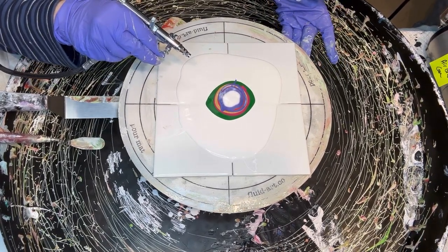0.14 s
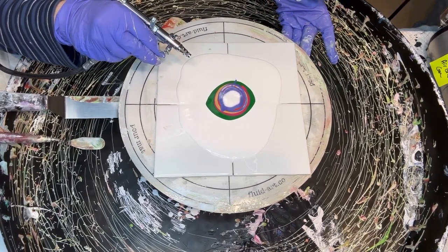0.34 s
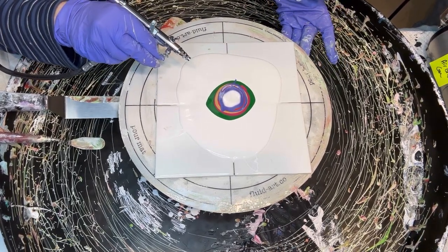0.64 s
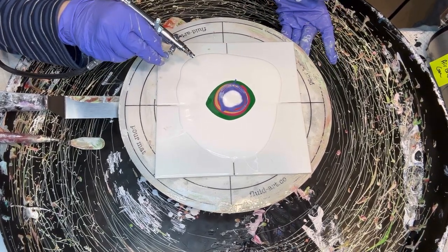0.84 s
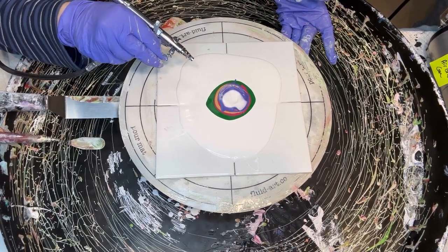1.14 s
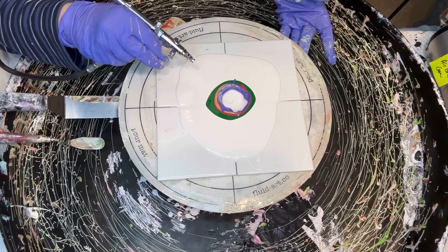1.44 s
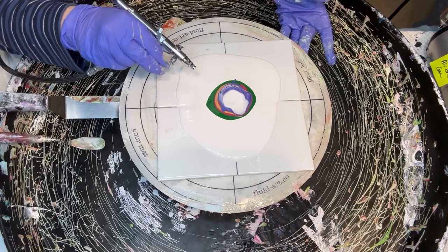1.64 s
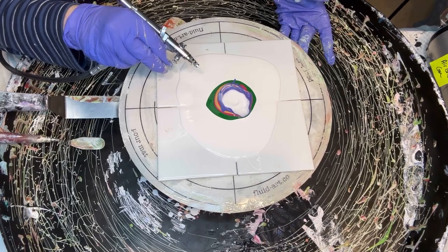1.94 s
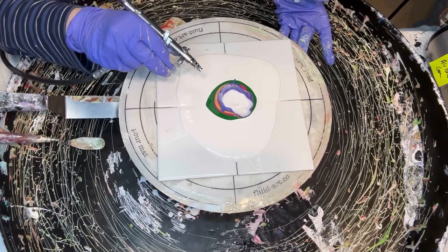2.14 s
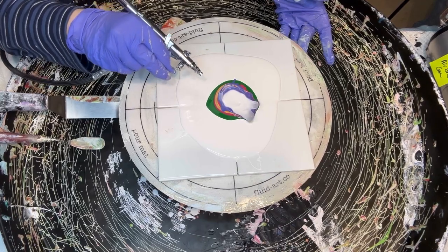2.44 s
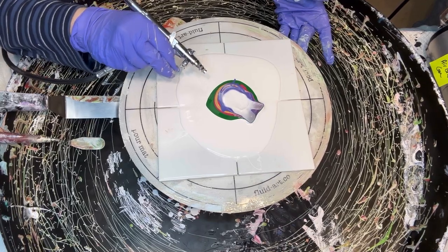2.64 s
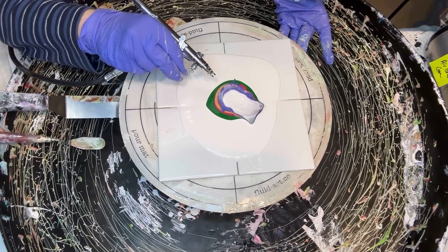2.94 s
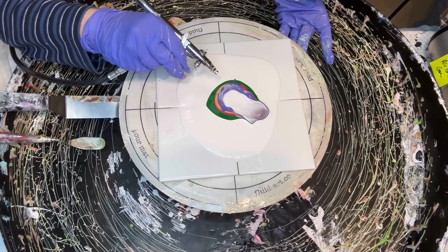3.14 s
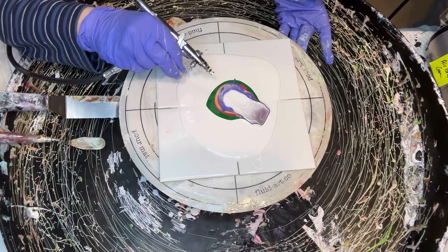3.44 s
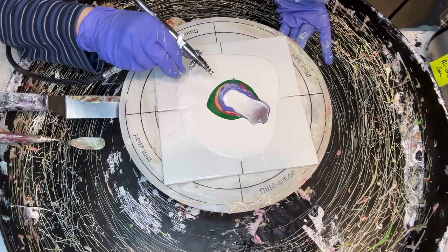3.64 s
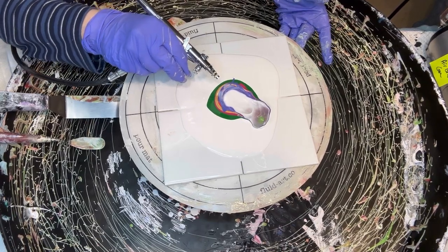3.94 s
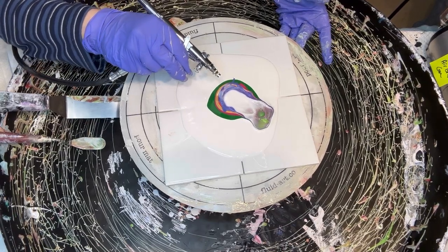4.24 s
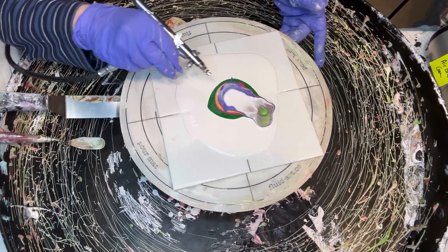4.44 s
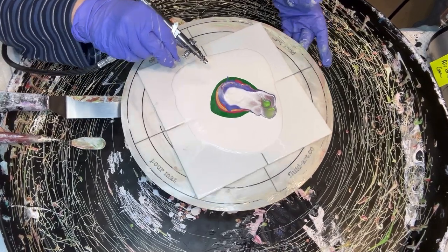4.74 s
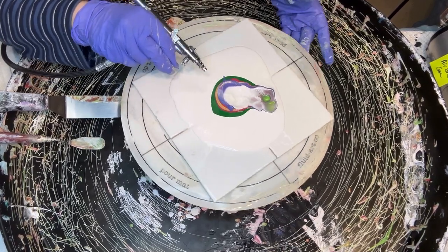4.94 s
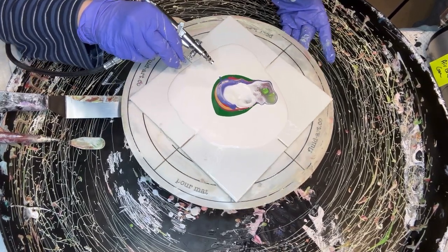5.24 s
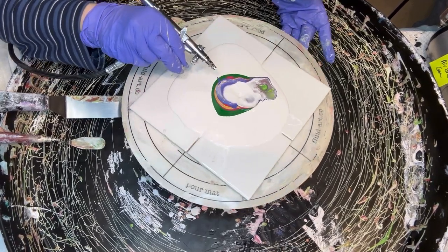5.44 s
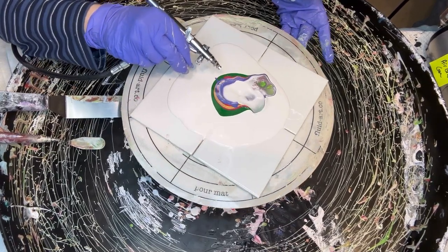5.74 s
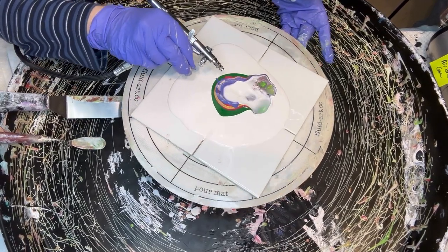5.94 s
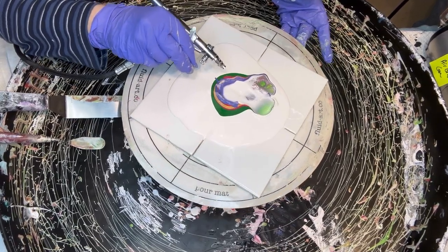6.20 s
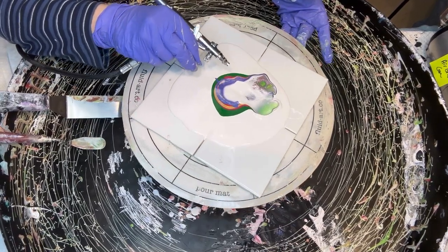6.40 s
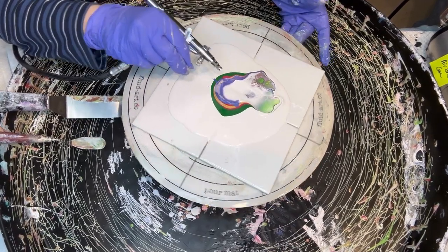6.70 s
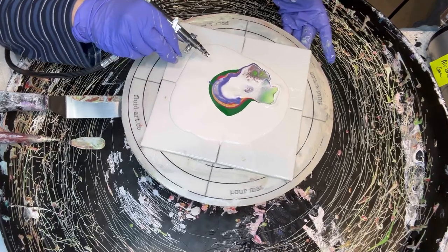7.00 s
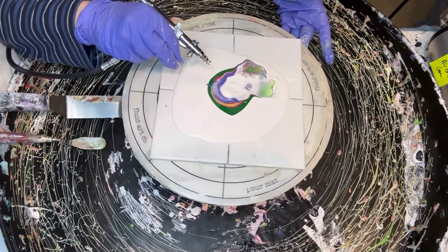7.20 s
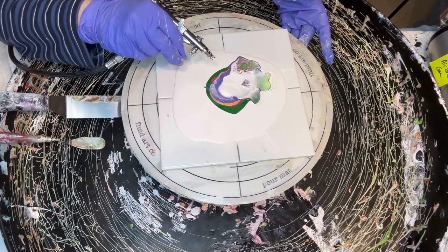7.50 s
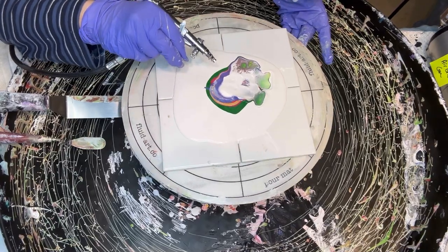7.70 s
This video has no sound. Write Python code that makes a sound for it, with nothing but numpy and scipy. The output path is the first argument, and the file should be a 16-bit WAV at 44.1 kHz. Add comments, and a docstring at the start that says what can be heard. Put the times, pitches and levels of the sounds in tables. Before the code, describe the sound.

A close, dry stereo sound at an indoor work table, lasting nearly eight seconds. From 0 s a thin, bright airbrush hiss is already blowing, over a very faint distant fan and dull room air. At about 0.03 s a small piston compressor under the table switches on: a few uneven, muffled knocks quicken, and by about 0.15 to 0.2 s it is at full speed. It then runs without stopping, roughly twenty-eight blows a second, a hard hollow metallic chatter with small reed ticks, loose rattle, low air thumps and a steady low electric hum. Over the first two seconds or so the pace eases very slightly and the knock colour shifts as the tank fills. The hiss wavers gently as the nozzle moves, a little stronger and thinner around 6.5 s, then eases back. Compressor and hiss continue to the end at about 7.9 s.

```python
"""A work table indoors: a small piston compressor comes up beneath it and settles to its speed, while an
airbrush hisses close by and a fan hums far off in the building. At each crank turn a valve knock rings the
housing, its reed answers and an air thump shakes the frame, all as decaying sines; the motor hums at twice
the mains rate, and its torque ripple shifts the knocks and weights every blow. Rattle and hiss are
coloured noise. A pair of close microphone ports listens."""
import sys
import numpy as np
from scipy import signal
from scipy.fft import rfft, irfft
from scipy.io import wavfile

SR = 44100
rng = np.random.default_rng(int(sys.argv[2]) if len(sys.argv) > 2 else 0)


def output_pcm(signal):
    """Save a mono or channel-first signal as 16-bit PCM at the path in sys.argv[1].

    Samples are clipped to [-1, 1] before scaling.
    """
    pcm = np.clip(np.atleast_2d(signal).T, -1, 1) * 32767
    wavfile.write(sys.argv[1], SR, np.round(pcm).astype(np.int16))


N = 346626
TIME = np.arange(N) / SR

# Airbrush jet; the tile echo changes as the paint spreads and the nozzle tilts:
# (time [s], level [dB], echo lag [ms], echo share [0-1], change below JET_BODY_HZ [dB])
JET_COURSE = [(0, -35.5, 0.19, 0.087, -3.5), (.1, -36, 0.24, .065, -0.5), (.3, -35.5, 0.26, 0.042, 1),
              (1.5, -34.5, 0.27, 0.076, 1.1), (2.6, -34.5, 0.21, .02, 1), (3.6, -34, 0.1, 0.028, 0.3),
              (4.3, -34.5, 0.21, 0.045, 0.1), (4.8, -34.5, 0.28, 0.025, 2), (5.4, -35, 0.228, 0.042, 1.8),
              (6.5, -32.5, .225, 0.064, -2.2), (7.2, -34, 0.216, 0.053, 1.5), (7.86, -35, 0.22, 0.08, 1)]
# Hiss changes as the nozzle moves: (time [s], change near JET_FOCUS_HZ [dB], change above JET_TOP_HZ [dB])
JET_SHIFT = [(0, -1, -1), (.6, 0.5, 1), (1.8, 1, 0.6), (2.6, 0, 0), (3.6, -3, 0.1), (4.6, 1, 0.5),
             (5.3, -2, 1), (6.3, 1, -0.5), (7.2, -.8, -0.1), (7.86, 1, 1.5)]
# Hiss colour: (frequency [Hz], relative density [dB per Hz])
JET_COLOUR = [(1000, -22), (2200, -9), (3000, -11.3), (4200, -10), (5500, -8.2), (6700, -4.2), (7800, -3.2),
              (9600, -3), (10600, -.8), (12300, -2), (14000, -.7), (15000, 2)]
# Share of hiss power common to both ports, heard directly: (frequency [Hz], share [0-1])
JET_DIRECT = [(2000, .3), (3000, .35), (4600, .3), (5700, .2), (7000, .72), (8000, .68), (9400, .78),
              (10000, .99), (11500, .99), (12200, .83), (14900, .82), (15200, 1)]
# Phase of the direct hiss at the right against the left; around 10-11.5 kHz the two sides sound in step:
# (frequency [Hz], phase [rad])
JET_PORTS = [(2600, 0), (3300, .4), (3800, 2.6), (7000, 3.1), (8200, 2.1), (9000, 1.1), (9900, 0),
             (11500, 0), (12000, -.75), (14900, -2.55), (15200, -3.14)]
# Rattle colour: (frequency [Hz], relative density [dB per Hz])
RATTLE_COLOUR = [(40, -19), (120, -40), (190, -1), (270, -4.5), (400, -4), (600, -5), (780, -15),
                 (920, -17), (1080, -8), (1250, -10), (1530, -8.5), (1680, -4.5), (1780, -14), (2600, -21),
                 (7000, -29)]
# Rattle likeness between left and right: (frequency [Hz], likeness [-1 to 1])
RATTLE_LIKENESS = [(60, 0.33), (300, -0.72), (900, 0.66), (2000, -0.059), (4000, 0.6)]
# Housing modes rung by the valve; the sign is the direction of the first swing:
# (frequency [Hz], t60 [s], full-tank height left, right [linear], empty-tank height left, right [linear])
HOUSING_MODES = [(247.6, 0.35, -0.0013, -0.0014, 0.00013, -0.0004),
                 (283.5, 0.33, -0.0017, -0.0011, -0.0027, -0.0026),
                 (298.9, 0.35, 0.0027, 0.0026, 0.0041, 0.0031),
                 (328.9, 0.35, -0.0019, -0.002, 0.0018, 0.0011),
                 (359.8, 0.35, 0.0017, 0.0012, 0.0047, 0.0031),
                 (387.9, 0.301, -0.0021, -0.0065, -0.0046, -0.0052),
                 (416.5, 0.06, 0.0069, 0.014, 0.0019, -0.0021),
                 (436.1, 0.35, -0.0073, -0.0099, 0.002, 0.0048),
                 (473.4, 0.35, 0.00031, -0.0022, 0.00099, -0.00035),
                 (495.8, 0.35, -8.4e-05, 0.0023, -7.5e-05, 0.002),
                 (534.8, 0.35, 0.0012, 0.0085, 0.0019, 0.0045),
                 (572.6, 0.35, -0.0033, -0.0075, -0.0052, -0.008),
                 (610.5, 0.198, -0.007, -0.01, -0.00022, 0.0035),
                 (642.5, 0.069, -0.008, -0.014, -0.015, -0.02),
                 (687.3, 0.22, -0.0038, -0.0091, -0.0051, -0.011),
                 (714.7, 0.013, 0.045, 0.087, 0.04, 0.053), (761.8, 0.071, -0.011, -0.01, -0.0099, -0.0098),
                 (797.9, 0.12, -0.016, -0.014, -0.013, -0.032),
                 (832.2, 0.137, -0.018, 0.0087, -0.021, 0.004), (843.8, 0.021, 0.094, 0.036, 0.11, 0.098),
                 (891.9, 0.092, -0.034, 0.091, -0.079, 0.11),
                 (906.1, 0.165, -0.04, 0.0019, -0.0069, -0.051),
                 (933.0, 0.057, -0.028, -0.2, -0.0012, -0.2), (952.4, 0.132, 0.0098, -0.0063, 0.014, 0.022),
                 (971.8, 0.259, 0.0031, -0.02, 0.0011, 0.0043),
                 (995.6, 0.163, 0.016, 0.019, 0.0039, 0.0098), (1051.1, 0.12, 0.0035, 0.01, -0.0019, 0.003),
                 (1098.5, 0.059, -0.00012, 0.0085, -0.0039, -0.01),
                 (1146.3, 0.051, 0.0052, -0.0058, 0.012, -0.022),
                 (1220.3, 0.054, 0.013, 0.015, 0.016, 0.0096),
                 (1228.8, 0.014, -0.054, -0.091, -0.061, -0.034),
                 (1266.9, 0.048, 0.018, 0.024, 0.012, 0.0036),
                 (1338.5, 0.121, 0.003, 0.0062, 0.0014, 0.0077),
                 (1363.5, 0.041, 0.0078, -0.0015, 0.017, -0.015),
                 (1415.4, 0.13, 0.0028, 0.00097, 0.00097, 0.0018),
                 (1474.5, 0.097, -0.0029, -0.0047, -0.0034, -0.004),
                 (1514.6, 0.152, -0.0045, 0.0015, -0.008, 0.0032),
                 (1565.5, 0.035, 0.00013, -0.0077, -0.0005, -0.027),
                 (1601.8, 0.122, -0.0058, -0.0035, -0.012, -0.00026),
                 (1637.4, 0.082, 0.0057, -0.0041, 0.0084, 0.0029),
                 (1653.9, 0.082, 0.0035, -0.0069, 0.0041, -0.0086),
                 (1691.6, 0.082, -0.0085, 0.011, -0.0087, 0.011),
                 (1777.5, 0.005, 0.045, 0.046, 0.068, 0.074)]
# Valve reed modes, heard just after each knock and again as the reed bounces:
# (frequency [Hz], t60 [s], full-tank height left, right [linear], empty-tank height left, right [linear])
REED_MODES = [(2070, .04, 0.00058, 0.0012, -0.00005, -0.0033),
              (2120, 0.15, 0.0000064, -0.001, -0.00027, 0.0085),
              (2250, 0.013, -0.0054, 0.00029, 0.0036, 0.0055),
              (3165, 0.11, -0.0012, 0.0018, 0.0019, -0.00034)]
# Frame modes shaken by the thump:
# (frequency [Hz], t60 [s], full-tank height left, right [linear], empty-tank height left, right [linear])
FRAME_MODES = [(65.6, .4, .018, .017, .021, .021), (88.5, .045, -.13, -.11, -.068, -.061),
               (110.2, .1, .1, .098, .063, .062), (155.3, .021, -.029, -.046, -.029, -.043),
               (198.3, .132, .0087, .012, .0075, .01)]
# How torque ripple moves and weights a knock or reed blow, left row then right:
# (shift [ms], shift phase [rad], weight [dB], weight phase [rad])
KNOCK_RIPPLE = [(.09, 1.35, .55, 3.2), (.098, 1.56, .6, 2.95)]
# The same for a thump: (shift [ms], shift phase [rad], weight [dB], weight phase [rad])
THUMP_RIPPLE = [(0, 0, 1.3, 3.5)] * 2
# How each part comes up after switch-on, one row each:
# (floor at rest [dB], spin-up [s], steepness [power], full-tank level [dB], empty-tank change [dB])
RATTLE_RISE = (-16, 0.06, 1, 2.6, -1)
HUM_RISE = (-35, .14, 1.1, -3.7, 1.2)
KNOCK_RISE = (-40, .089, 3.2, -.4, .8)
THUMP_RISE = (-35, .08, 1.6, 0, 0)
# Uneven first blows: (time [s], mode height before random strength and dulling [dB])
RUN_UP_BLOWS = [(0.039, -50), (.049, -53), (.056, -45), (0.063, -46.5), (.080, -46), (0.095, -43),
                (.104, -41)]

# Airbrush: hiss bands, wavering flow, and the echo off the table
JET_BODY_HZ, JET_FOCUS_HZ, JET_FOCUS_WIDE_HZ, JET_TOP_HZ = 10400, 11200, 700, 12200
FLUTTER_DB, FLUTTER_PER_S = .28, 9
TABLE_ECHO_MS, TABLE_ECHO_SHARE = .605, .07

# Distant fan, its rumble, and the air of the room
FAN_HZ, FAN_DB, FAN_RAD = 58.88, -59.5, .63
RUMBLE_DB, RUMBLE_HZ = -61, (48, 77)
ROOM_DB, ROOM_HZ = -55, (60, 724)

# Crank: the angle starts behind a steady rotation and catches up as tank pressure builds
START_TURN, TURNS_PER_S, SURPLUS_TURNS, SETTLE_S = .6184, 27.6495, .487, 1.801
SWITCH_ON_S, RIPPLE_HZ = .033, 120.045
FILL_S = 1.6  # the blows change colour as the tank fills

# Levels before each rise; REPEATING is the share of rattle power that comes back alike on every turn
RATTLE_DB, RATTLE_LEFT_DB, REPEATING = -50, .1, .1
HUM_DB = -37

# Blow positions in the turn (pairs are left, right); the blows lead a little against an empty tank
KNOCK_TURNS, THUMP_TURNS, EMPTY_LEAD_TURNS = (.6127, .6061), (.8133, .8019), .008
REED_TURNS, BOUNCE_TURNS, BOUNCE_DB = .665, .75, -12.5
VALVE_SOFT_HZ = 1900  # the valve plate lands softly: its click is rolled off above this
RUN_UP_T60_S, RUN_UP_DULL_HZ = .04, 950  # slow blows are short and dull

CUTOFF_HZ = 15730


def from_db(db):
    """Decibels to amplitude gain."""
    return 10 ** (np.asarray(db) / 20)


def rms_one(x):
    """Scale to rms 1."""
    return x / np.sqrt(np.mean(x ** 2) + 1e-20)


def in_time(rows):
    """Each column of a time table at every sample."""
    s, *columns = np.transpose(rows)
    return [np.interp(TIME, s, column) for column in columns]


def at_hz(points, hz):
    """Read a (frequency, value) table on a log frequency axis."""
    table_hz, values = np.transpose(points)
    return np.interp(np.log(hz + 1), np.log(table_hz), values)


def band(x, edges_hz):
    """Keep one band of a signal."""
    return signal.sosfilt(signal.butter(2, edges_hz, "band", fs=SR, output="sos"), x)


def crank():
    """Crank angle in turns: slightly fast at first, easing to its final speed."""
    return START_TURN + TURNS_PER_S * TIME - SURPLUS_TURNS * np.exp(-TIME / SETTLE_S)


def rise(rest_db, spin_s, steepness, full_db, empty_db):
    """Level in dB: a floor at rest, then spinning up, then following the tank pressure."""
    up = np.clip((TIME - SWITCH_ON_S) / spin_s, 0, 1) ** steepness
    running = up * from_db(full_db + empty_db * np.exp(-TIME / SETTLE_S))
    return 20 * np.log10(np.maximum(running, from_db(rest_db)))


def ring(clicks, hz, t60):
    """A two-pole resonator: a unit click starts a decaying sine of height 1."""
    r = from_db(-60 / (t60 * SR))
    w = 2 * np.pi * hz / SR
    return signal.lfilter([0, np.sin(w)], [1, -2 * r * np.cos(w), r * r], clicks)


def strokes(modes, at_turns, ripple, level_db, scatter_db, jitter_ms):
    """One blow per turn rings every mode; torque ripple can move the blow early or late and weights it."""
    out = np.zeros((2, N))
    turns = np.arange(int(crank()[-1]))
    chance = rng.standard_normal((len(turns), len(modes) + 1))
    for side in range(2):
        shift_ms, shift_rad, accent_db, accent_rad = ripple[side]
        s = np.interp(turns + at_turns[side], crank(), TIME)
        empty = np.exp(-s / FILL_S)
        s = s - EMPTY_LEAD_TURNS * empty / TURNS_PER_S  # the valve opens sooner against low pressure
        shift = shift_ms * np.sin(2 * np.pi * RIPPLE_HZ * s + shift_rad)
        s = s + (shift + jitter_ms * chance[:, -1]) / 1000
        accent = accent_db * np.cos(2 * np.pi * RIPPLE_HZ * s + accent_rad)
        at = np.clip(s * SR, 0, N - 2)
        whole, part = at.astype(int), at % 1
        for k, (hz, t60, *height) in enumerate(modes):
            colour = height[side] * (1 - empty) + height[side + 2] * empty
            size = colour * from_db(level_db[whole] + accent + scatter_db * chance[:, k])
            clicks = np.full(N, 1e-18)
            clicks[whole] = size * (1 - part)  # a blow falls between two samples
            clicks[whole + 1] = size * part
            out[side] += ring(clicks, hz, t60)
    return out


def jet(level_db, echo_ms, echo_share, body_db):
    """Airbrush turbulence: smooth bright noise, combed by echoes off the tile and the table."""
    hz = np.fft.rfftfreq(N, 1 / SR)
    share = np.clip(at_hz(JET_DIRECT, hz), 0, 1)
    table = 1 + TABLE_ECHO_SHARE * np.exp(-2j * np.pi * hz * TABLE_ECHO_MS / 1000)
    direct, left, right = rfft(rng.standard_normal((3, N))) * from_db(at_hz(JET_COLOUR, hz)) * table
    port_phase = np.exp(1j * at_hz(JET_PORTS, hz))
    pair = np.sqrt(share) * direct * [np.ones(len(hz)), port_phase] + np.sqrt(1 - share) * [left, right]

    # The moving tile echo is read between samples from a five times finer copy
    fine = 5 * irfft(pair, 5 * N)
    fine_time = np.arange(5 * N) / (5 * SR)
    echo = [np.interp(TIME - echo_ms / 1000, fine_time, channel) for channel in fine]
    hiss = irfft(pair, N) + echo_share * echo

    body = irfft(pair / (1 + (hz / JET_BODY_HZ) ** 12), N)
    focus = irfft(pair * np.exp(-((hz - JET_FOCUS_HZ) / JET_FOCUS_WIDE_HZ) ** 2), N)
    top = irfft(pair / (1 + (JET_TOP_HZ / (hz + 1)) ** 24), N)
    focus_db, top_db = in_time(JET_SHIFT)
    # The flow wavers slowly, separately in each band
    slow = irfft(rfft(rng.standard_normal((3, N))) / (1 + (hz / FLUTTER_PER_S) ** 2), N)
    changes_db = (body_db, focus_db, top_db) + FLUTTER_DB * rms_one(slow)
    for part, db in zip((body, focus, top), changes_db):
        hiss += (from_db(db) - 1) * part
    return rms_one(hiss) * from_db(level_db)


def far_fan():
    """Another motor far off in the building: a faint low tone, a little rumble and the dull air of the room."""
    tone = np.sqrt(2) * np.sin(2 * np.pi * FAN_HZ * TIME + FAN_RAD)
    mid, side = band(rng.standard_normal((2, N)), RUMBLE_HZ)
    rumble = rms_one(mid + .4 * side * [[1], [-1]])
    air = band(rng.standard_normal((2, N)), ROOM_HZ)
    room = rms_one(air[0] + .21 * air)  # mostly shared by the two ports
    return from_db(FAN_DB) * tone + from_db(RUMBLE_DB) * rumble + from_db(ROOM_DB) * room


def rattle(level_db, between=.54, fade_turns=.05):
    """Loose parts and escaping air: partly repeating noise that flares once a turn and dies to a steady bed."""
    hz = np.fft.rfftfreq(N, 1 / SR)
    alike = np.clip(at_hz(RATTLE_LIKENESS, hz), -1, 1)
    fresh, stored = rng.standard_normal((2, 2, N))
    again = stored[:, (crank() % 1 * SR / TURNS_PER_S).astype(int)]  # same noise at the same crank angle
    noise = np.sqrt(1 - REPEATING) * fresh + np.sqrt(REPEATING) * again
    mid, side = rfft(noise) * from_db(at_hz(RATTLE_COLOUR, hz))
    pair = irfft(np.sqrt(1 + alike) * mid + np.sqrt(1 - alike) * side * [[1], [-1]], N)
    flare = between + np.exp(-((crank() - KNOCK_TURNS[1]) % 1) / fade_turns)
    balance = from_db([[RATTLE_LEFT_DB], [-RATTLE_LEFT_DB]])
    return rms_one(pair * flare) * from_db(RATTLE_DB + level_db) * balance


def hum(level_db):
    """Magnetic hum; the piston load bends it once a turn, which adds side tones mostly above it."""
    load = np.exp(2j * np.pi * (crank() - .95))
    bent = 1 / (1 - .42 * load) + .09 / load
    tone = np.exp(1j * (2 * np.pi * RIPPLE_HZ * TIME + 2.0))
    return np.sqrt(2) * from_db(HUM_DB + level_db) * np.real(bent * tone)


def valve_knock():
    """The valve plate strikes the housing each turn and rings its modes; the soft landing dulls the click."""
    knock = strokes(HOUSING_MODES, KNOCK_TURNS, KNOCK_RIPPLE, rise(*KNOCK_RISE), scatter_db=.2, jitter_ms=.008)
    soft = signal.butter(8, VALVE_SOFT_HZ, fs=SR, output="sos")
    return signal.sosfilt(soft, knock + run_up())


def reed():
    """The valve reed rings just after the knock and again, more weakly, as it bounces."""
    out = np.zeros((2, N))
    for turns, db in [(REED_TURNS, 0), (BOUNCE_TURNS, BOUNCE_DB)]:
        level_db = rise(*KNOCK_RISE) + db
        out += strokes(REED_MODES, (turns, turns), KNOCK_RIPPLE, level_db, scatter_db=5.0, jitter_ms=.056)
    return out


def air_thump():
    """A push of air each turn shakes the low modes of the frame."""
    return strokes(FRAME_MODES, THUMP_TURNS, THUMP_RIPPLE, rise(*THUMP_RISE), scatter_db=.05, jitter_ms=.02)


def run_up():
    """Uneven first blows as the motor runs up; each catches the housing modes with random strengths."""
    s, db = np.transpose(RUN_UP_BLOWS)
    chance = rng.standard_normal((len(s), len(HOUSING_MODES)))
    out = np.zeros((2, N))
    for k, (hz, t60, *_) in enumerate(HOUSING_MODES):
        dulling = np.hypot(1, (hz / RUN_UP_DULL_HZ) ** 3)
        clicks = np.full((2, N), 1e-18)
        clicks[:, (s * SR).astype(int)] = from_db(db) * chance[:, k] / dulling
        out += ring(clicks, hz, min(t60, RUN_UP_T60_S))
    return out


def scene():
    """Airbrush close to the ports, compressor under the table, fan far off."""
    surroundings = jet(*in_time(JET_COURSE)) + far_fan()
    motor = rattle(rise(*RATTLE_RISE)) + hum(rise(*HUM_RISE))
    blows = valve_knock() + reed() + air_thump()
    return surroundings + motor + blows


def record(dry):
    """The microphone pair: deep bass and the extreme top are cut."""
    thin = signal.sosfilt(signal.butter(4, 42, "high", fs=SR, output="sos"), dry)
    return signal.sosfilt(signal.ellip(14, .3, 90, CUTOFF_HZ, fs=SR, output="sos"), thin)


dry = scene()
out = record(dry)
output_pcm(out)
```